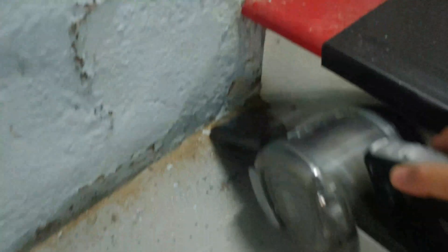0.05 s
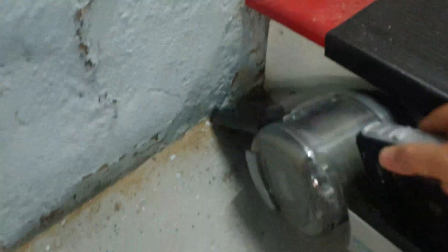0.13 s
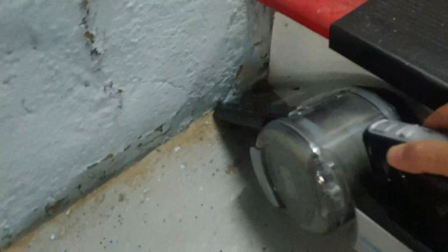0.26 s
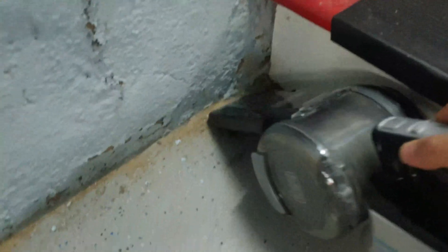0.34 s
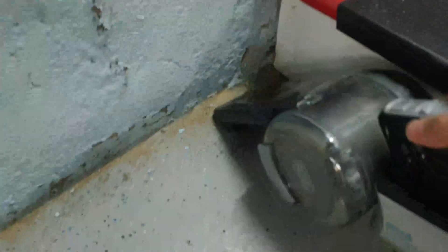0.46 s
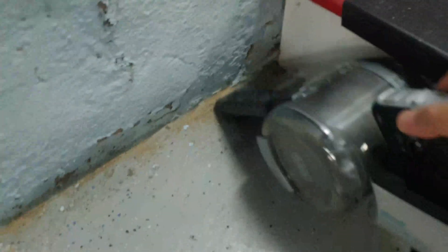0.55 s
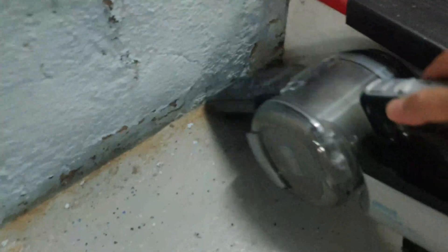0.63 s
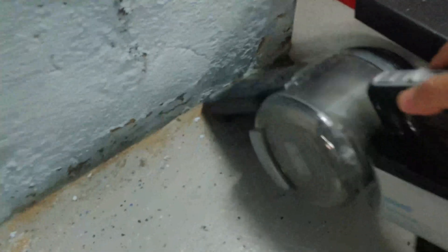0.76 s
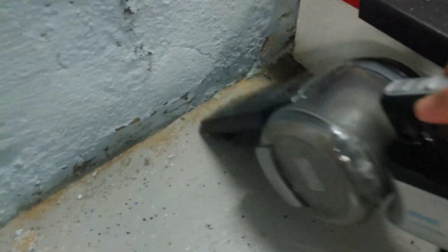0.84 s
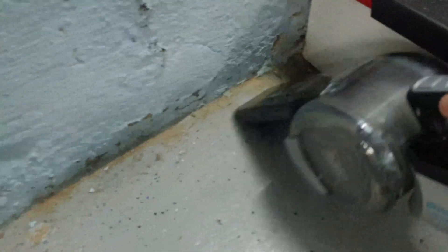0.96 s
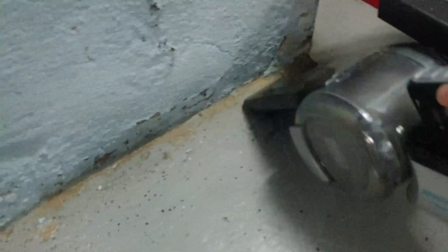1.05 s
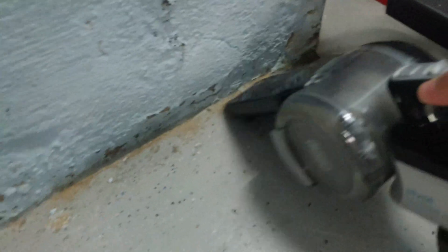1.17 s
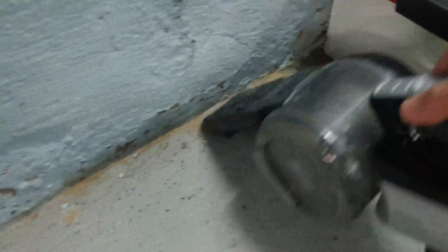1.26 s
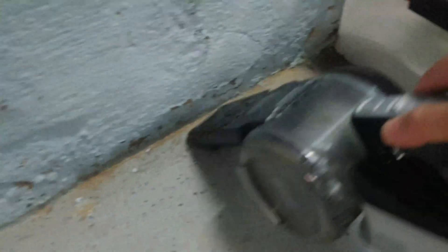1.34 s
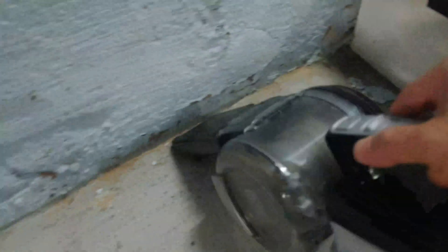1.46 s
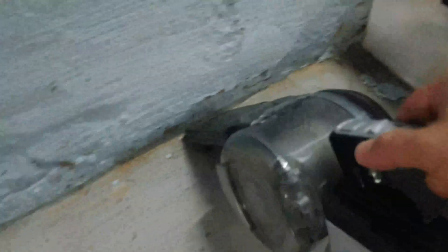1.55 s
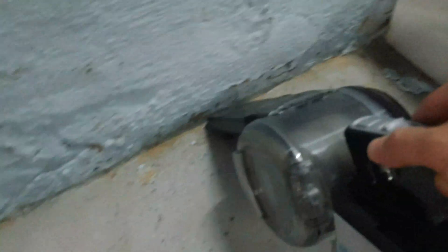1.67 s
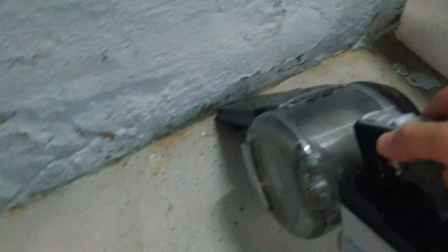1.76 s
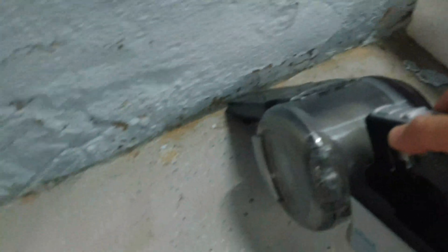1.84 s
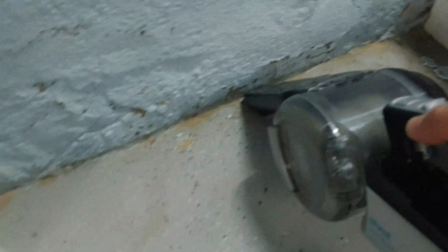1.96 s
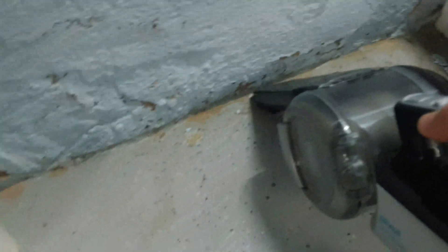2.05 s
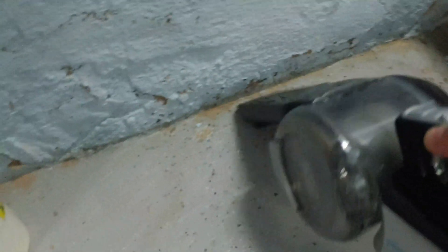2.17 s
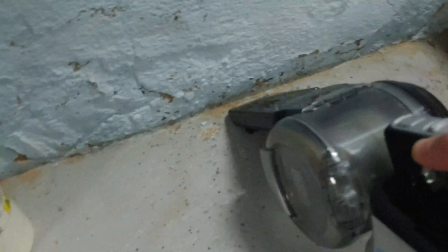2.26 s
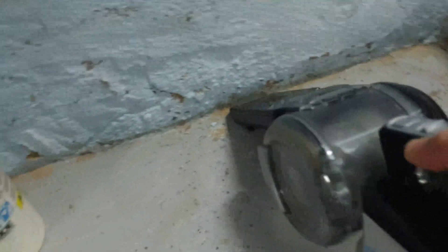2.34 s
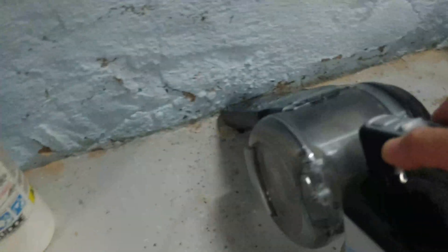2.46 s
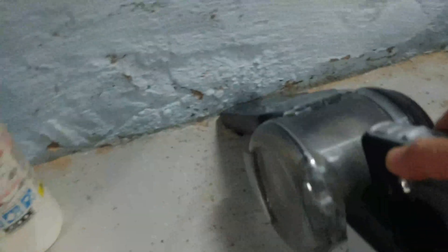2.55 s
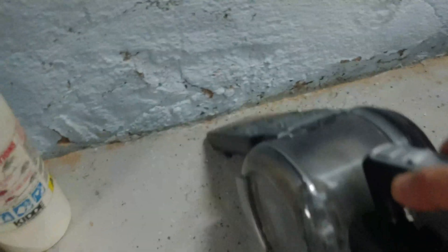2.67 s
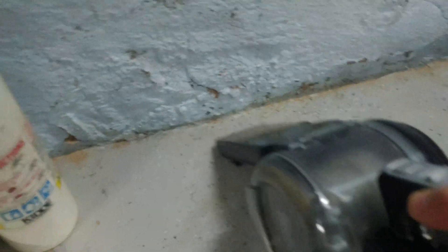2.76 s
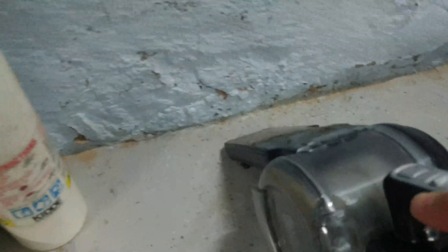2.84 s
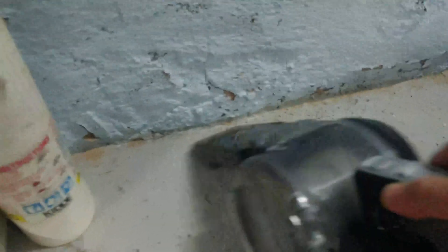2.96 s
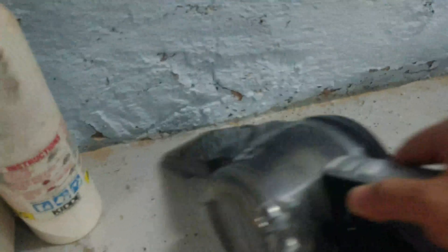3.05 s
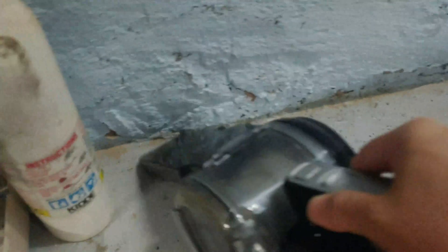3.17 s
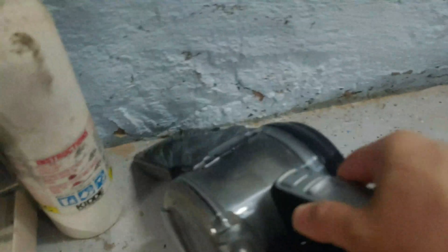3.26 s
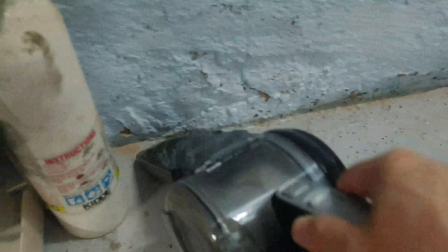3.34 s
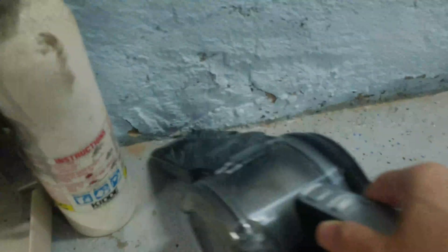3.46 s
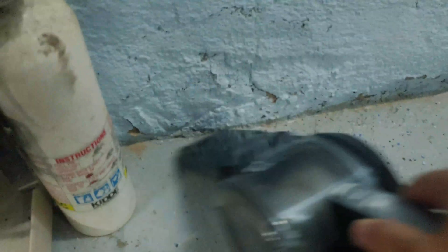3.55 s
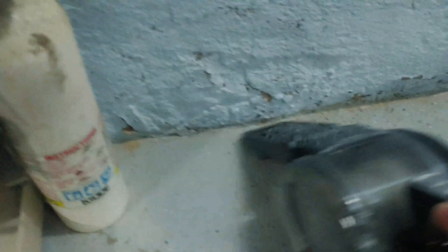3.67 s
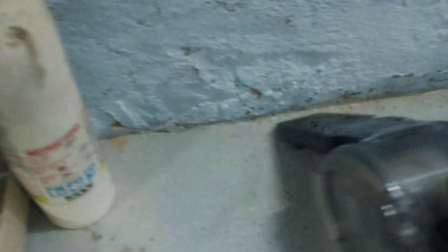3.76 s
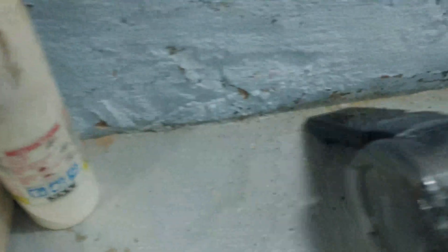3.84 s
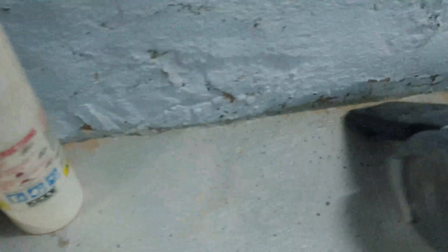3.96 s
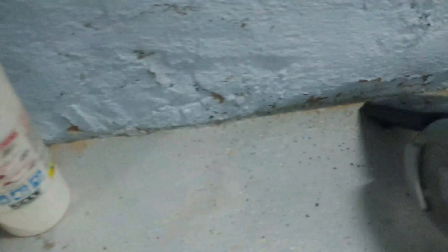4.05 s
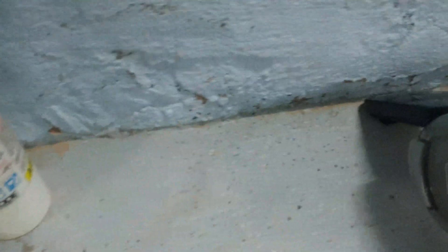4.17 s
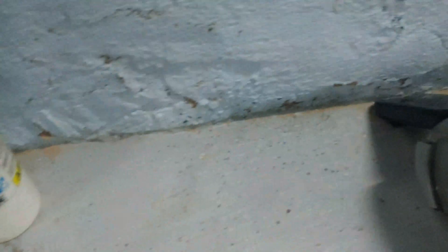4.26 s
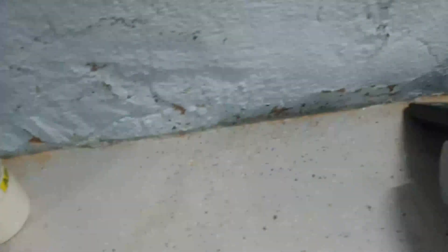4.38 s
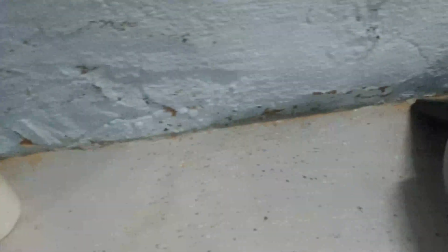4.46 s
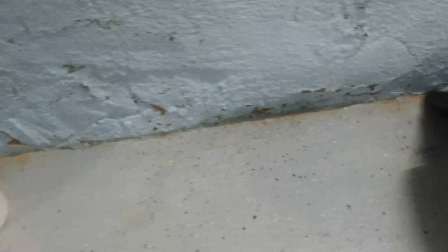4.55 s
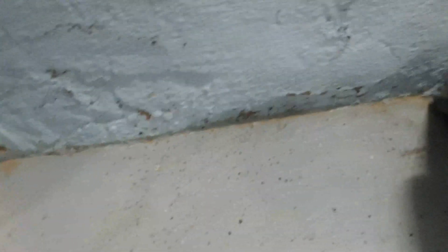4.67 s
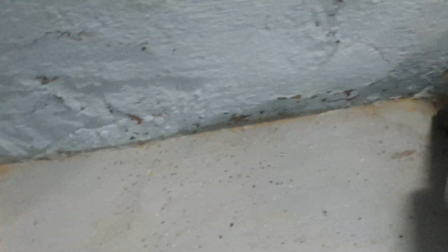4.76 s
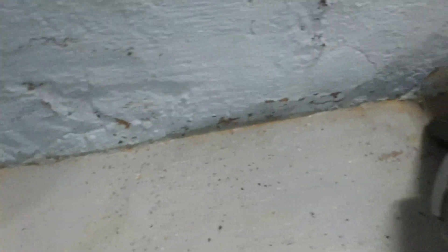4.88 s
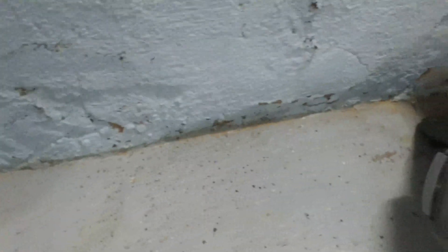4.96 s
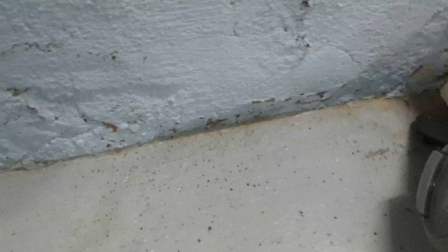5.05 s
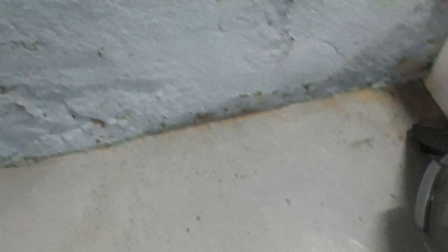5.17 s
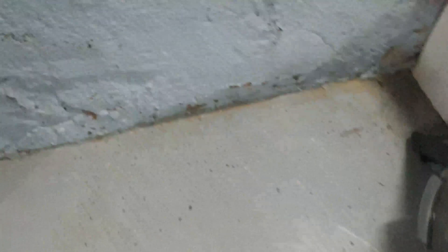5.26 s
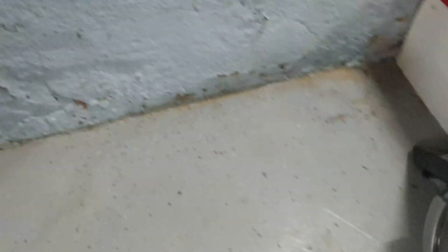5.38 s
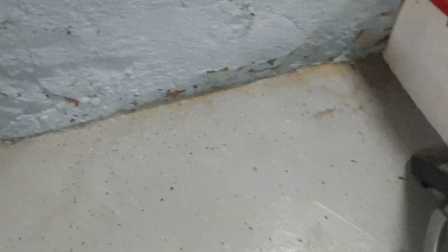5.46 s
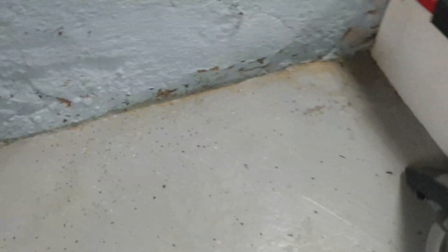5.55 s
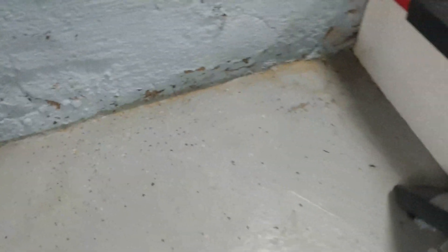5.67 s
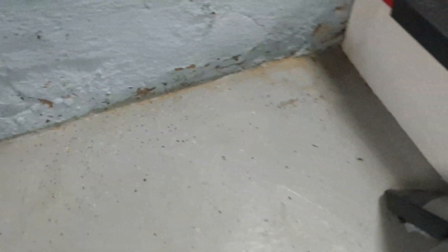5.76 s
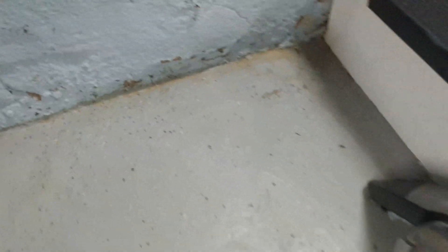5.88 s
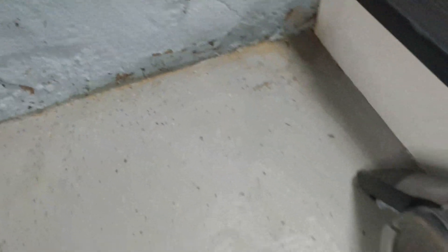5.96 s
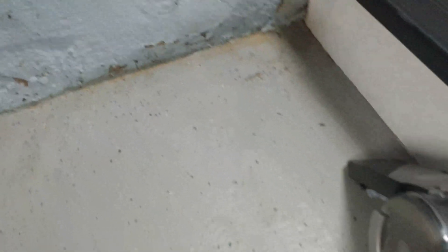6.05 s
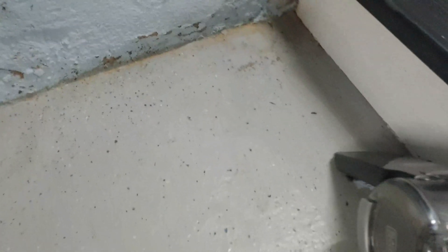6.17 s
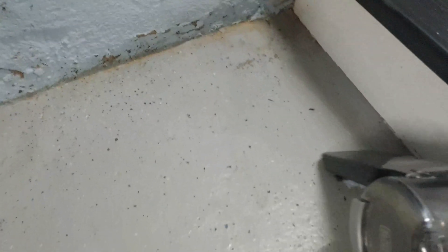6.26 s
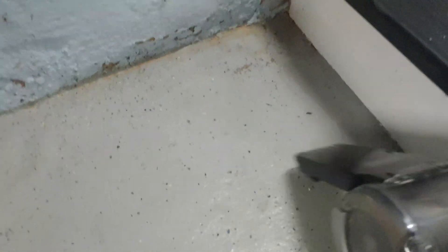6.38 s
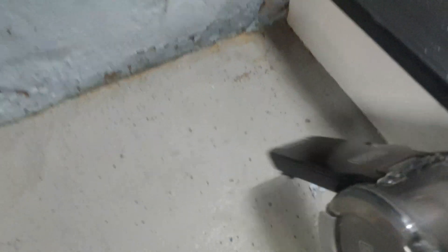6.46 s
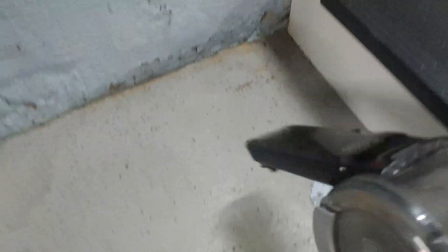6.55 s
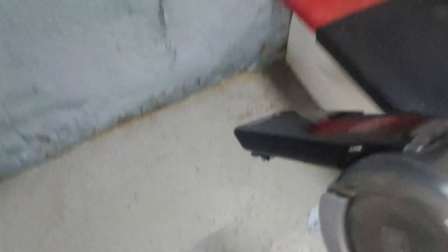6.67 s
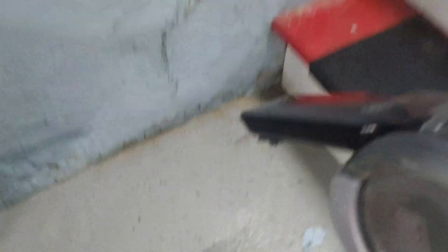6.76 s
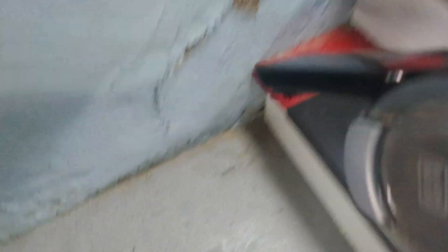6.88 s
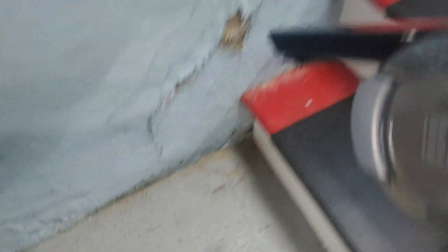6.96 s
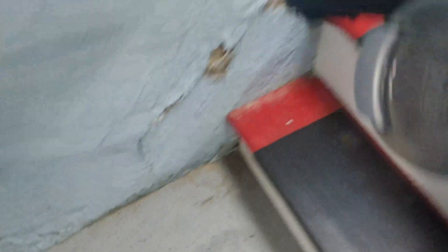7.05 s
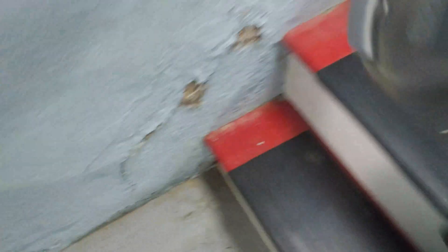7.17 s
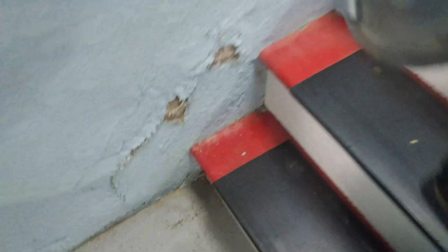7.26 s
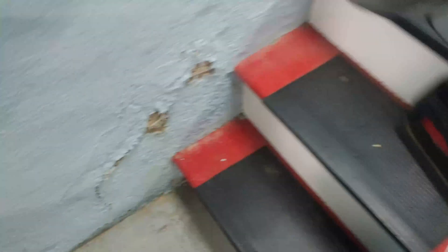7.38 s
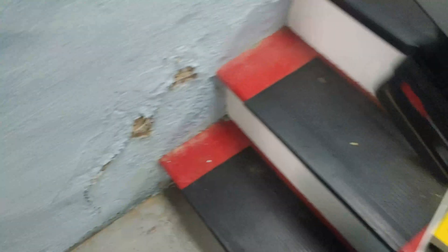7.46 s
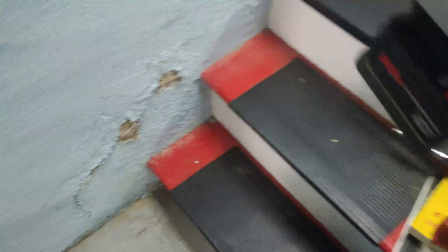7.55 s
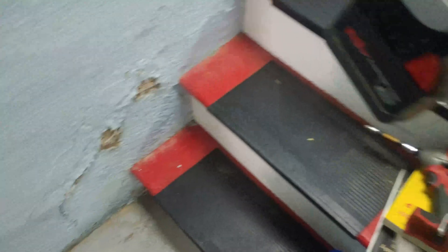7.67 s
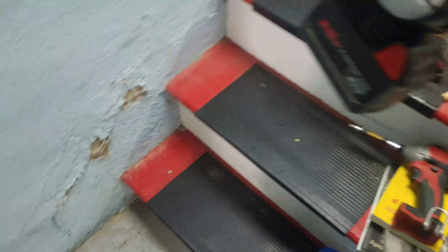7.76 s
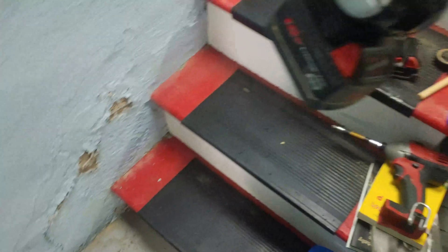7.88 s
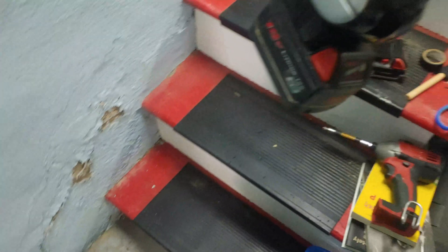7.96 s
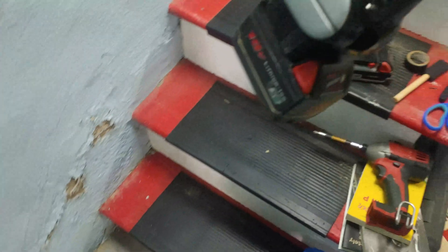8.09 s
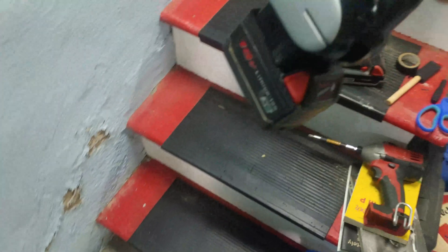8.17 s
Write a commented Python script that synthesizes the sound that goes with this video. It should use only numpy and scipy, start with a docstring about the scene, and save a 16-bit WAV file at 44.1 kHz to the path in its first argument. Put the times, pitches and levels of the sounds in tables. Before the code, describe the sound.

Indoors in a small plastered stairwell, a handheld vacuum cleaner drones close by. Air rushes in at the nozzle and hisses from the vents over a hum and wavering whine, with brief dips and dull knocks. Then the power goes off and the motor slides lower, the airflow weakening, with low handling rumble and a short chatter of plastic before near quiet.

```python
"""On a stair landing, a cordless handheld vacuum is drawn along the foot of a wall, close to the listener.
Its motor sounds as sinusoids locked to the shaft angle: a hum, a blade whine and faint overtones.
Its air is filtered noise, rushing in at the nozzle, through the duct and hissing out of the vents.
It is switched off and coasts down, so that all tones glide lower and the air fades.
Noise bursts rumble and bump; a plastic part, a set of decaying modes, clacks as it is lifted away."""
import sys
import numpy as np
from scipy import signal
from scipy.fft import rfft, irfft, next_fast_len
from scipy.io import wavfile
from scipy.ndimage import uniform_filter1d, map_coordinates

SR = 44100
rng = np.random.default_rng(int(sys.argv[2]) if len(sys.argv) > 2 else 0)


def wav_record(signal):
    """Record a signal, one row per channel, as 16-bit PCM in the file named by sys.argv[1]."""
    frames = np.transpose(np.atleast_2d(signal))
    bounded = np.clip(frames, -1, 1)
    # unit amplitude maps onto the largest positive 16-bit level
    quanta = np.round(bounded * 32767).astype(np.int16)
    wavfile.write(sys.argv[1], SR, quanta)


N = 362487
TIME = np.arange(N) / SR  # s


def undb(db):
    """Level law: decibels to an amplitude ratio."""
    return 10 ** (np.asarray(db) / 20)


def unit(x):
    """Normalisation to a root-mean-square value of 1."""
    return x / np.sqrt(np.mean(x ** 2))


def curves(rows):
    """Linear interpolation: each column of a table is joined by straight lines in time."""
    s, *columns = np.transpose(rows)
    return [np.interp(TIME, s, column) for column in columns]


def colour(x, spectrum):
    """Linear filtering: the spectrum is weighted by levels interpolated over log frequency."""
    hz, db = np.transpose(spectrum)
    size = next_fast_len(len(x))
    bins_hz = np.maximum(np.arange(size // 2 + 1) * SR / size, 1)
    gain = undb(np.interp(np.log(bins_hz), np.log(hz), db))
    return irfft(rfft(x, size) * gain, size)[:len(x)]


def noise(spectrum):
    """Random noise: white noise coloured by a spectrum and brought to unit strength."""
    return unit(colour(rng.standard_normal(N), spectrum))


def walk(rate):
    """Random modulation: smooth chance with a spread of 1, changing about rate times a second."""
    knots = rng.standard_normal(8192)
    path = np.interp(TIME * rate, np.arange(len(knots)), knots)
    return unit(uniform_filter1d(path, max(int(SR / rate / 2), 1)))


def bursts(rows, rise_s, t60):
    """Exponential decay: blows given as (s, dB) swell quickly and lose 60 dB in t60 seconds."""
    envelope = np.zeros(N)
    for s, db in rows:
        age = TIME[TIME > s] - s
        decay = undb(db - 60 * np.minimum(age / t60, 10))
        envelope[N - len(age):] += decay * (1 - np.exp(-age / rise_s))
    return envelope


def resonance(tone_hz, hz, width):
    """Resonance curve: 1 when the tone sits on the resonance, one half at half the width away."""
    return 1 / (1 + (2 * (tone_hz - hz) / width) ** 2)


# Spectrum of the quiet room. Each row: frequency in Hz, relative level in dB per Hz.
ROOM_SPECTRUM = [(20, 1), (50, 13), (150, -20), (400, 6), (900, -37), (2000, -61), (16000, -74)]


def room_tone():
    """Stationary background noise: a faint coloured noise of constant level."""
    return undb(-52) * noise(ROOM_SPECTRUM)


def stairwell(x, t60, wet_db):
    """Diffuse reverberation: plastered walls return a short, exponentially decaying noise tail."""
    age = TIME[:SR // 2]
    tail = rng.standard_normal(len(age)) * undb(-60 * age / t60) * (age > .006)
    return x + undb(wet_db) * signal.fftconvolve(x, tail / np.linalg.norm(tail))[:N]


# Low rumbles as the hand swings. Each row: start in seconds, relative level in dB.
RUMBLE_TIMES = [(2.62, -26), (3.1, -32), (6.82, -27), (7.55, -38.5), (8.05, -79)]
# Spectrum of the rumble. Each row: frequency in Hz, relative level in dB per Hz.
RUMBLE_SPECTRUM = [(15, -12), (40, 0), (80, 1), (130, -23), (300, -59)]


def rumbles():
    """Low-frequency noise bursts: each swing of the hand rumbles and dies away."""
    return noise(RUMBLE_SPECTRUM) * bursts(RUMBLE_TIMES, rise_s=0.047, t60=1.0)


# Soft bumps of the body. Each row: start in seconds, relative level in dB.
BUMP_TIMES = [(0.722, -20), (1.317, -25), (1.506, -21), (2.701, -43), (4.067, -13), (4.619, -5.5),
              (4.778, -19), (5.417, -24)]
# Spectrum of a bump. Each row: frequency in Hz, relative level in dB per Hz.
BUMP_SPECTRUM = [(30, -22), (90, -9), (150, -19.5), (290, -5), (430, -19.5), (700, -14), (2000, -66)]
BUMP_DB = -6.5  # gain of all bumps


def bumps():
    """Damped impact: each dull bump is a short burst of low noise."""
    return undb(BUMP_DB) * noise(BUMP_SPECTRUM) * bursts(BUMP_TIMES, rise_s=0.0044, t60=0.13)


# A plastic part chatters and seats. Each row: start in seconds, relative level in dB.
CONTACTS = [(7.8204, -10.5), (7.822, -15), (7.8265, -9.5), (7.8306, -16.5), (7.831, -14), (7.8340, -5.5),
            (7.836, -12), (8.056, -33)]
# Modes of the plastic. Each row: frequency in Hz, relative level in dB, 60 dB decay time in seconds.
PLASTIC_MODES = [(1050, -29, .012), (3160, -33, 0.028), (5170, -18, 0.013), (5490, -14, 0.017),
                 (7000, -9.5, 0.013), (7530, 1.5, 0.0063), (8050, -2, 0.0074), (8550, -8, 0.011),
                 (10330, -12, 0.01), (12000, -14, 0.0074), (14700, -11, .004)]


def clacks():
    """Modal excitation: each contact rings the plastic, and a short rustle of ringing follows."""
    age = TIME[:SR // 10]
    ring = sum(undb(db - 60 * age / t60) * np.sin(2 * np.pi * hz * age)
               for hz, db, t60 in PLASTIC_MODES)
    ring = ring * (1 - np.exp(-age / 0.00018))
    blows = np.zeros(N)
    for s, db in CONTACTS:
        blows[int(s * SR)] += undb(db)
    rustle = undb(-36) * rng.standard_normal(N) * bursts(CONTACTS, rise_s=0.0016, t60=0.067)
    return undb(5.0) * signal.fftconvolve(blows + rustle, ring)[:N]


def handling():
    """Superposition: rumble of swinging, dull bumps of the body and sharp chatter of plastic."""
    return rumbles() + bumps() + clacks()


# Motor speed under power, following the load and the draining battery.
# Each row: time in seconds, shaft frequency in Hz.
RUNNING_SPEED = [(0.0, 554.3), (1.35, 555.6), (1.8, 553.7), (3.0, 553.8), (3.5, 552.4), (4.3, 553.2),
                 (5.0, 551.4), (6.19, 549.1)]
SHAFT_HZ = 554  # nominal full speed
OFF_S = 6.186  # time of switching off
FRICTION_S, DRAG_PER_S = 1.783, 0.5  # friction time constant in s, fan drag at full speed in 1/s


def shaft_speed():
    """Rotational damping: a share of full speed, nearly steady, then braked by friction and fan drag."""
    decay = np.exp(-np.maximum(TIME - OFF_S, 0) / FRICTION_S)
    drag = 1 + DRAG_PER_S * FRICTION_S * (1 - decay)
    return curves(RUNNING_SPEED)[0] / SHAFT_HZ * decay / drag


def patchy(x, width_hz, rate, patchy_db):
    """Interference of many nearby reflections: narrow bands swell and fade independently."""
    hz, s, frames = signal.stft(x, SR, nperseg=2048)
    field = rng.standard_normal((1024, 256))
    place = np.meshgrid(hz / width_hz, s * rate, indexing="ij")
    db = patchy_db * map_coordinates(field, place, order=1, mode="mirror")
    return unit(signal.istft(frames * undb(db), SR)[1][:N])


# The rush dips briefly. Each row: centre in seconds, relative depth in dB.
RUSH_DIPS = [(.35, 5), (.39, 7), (.52, 4), (.65, 7), (.70, 13), (.82, 4), (1.30, 13), (1.35, 4), (1.72, 4),
             (1.93, 5), (2.035, 5), (2.25, 6), (3.42, 4), (4.02, 5), (4.25, 5), (4.72, 7), (5.77, 4),
             (6.02, 5), (6.19, 5), (7.52, 4)]


def dips(length_s):
    """Amplitude modulation: smooth brief drops in level, in dB."""
    return -sum(db * np.exp(-((TIME - s) / length_s) ** 2) for s, db in RUSH_DIPS)


def falling(speed, law):
    """Power law of flow noise: its gain falls with speed, with one swell as the cleaner is lifted."""
    power, s, length_s, db = law
    return speed ** power * undb(db * np.exp(-((TIME - s) / length_s) ** 2))


# Air at the nozzle, louder as it closes on the floor.
# Each row: time in seconds, relative buffeting level in dB, relative rush level in dB.
INTAKE_LEVELS = [(0.0, -30.5, -25), (0.36, -41, -26), (1.22, -34, -26), (1.94, -45.5, -30),
                 (2.6, -37.5, -30), (2.68, -36, -28.5), (2.9, -41, -27), (3.26, -28, -23), (3.42, -49, -29),
                 (3.8, -30, -22), (4.0, -44, -31.5), (4.1, -28.5, -24), (4.26, -37, -29.0),
                 (4.62, -33, -28.5), (5.02, -48, -34), (5.7, -40.5, -27.5), (5.76, -47.0, -33),
                 (6.18, -48.5, -28)]
# Spectrum of the buffeting. Each row: frequency in Hz, relative level in dB per Hz.
BUFFET_SPECTRUM = [(15, -32), (40, -6.5), (105, 4), (200, -1), (300, -3), (450, -36), (900, -20.5)]
# Spectrum of the nozzle rush. Each row: frequency in Hz, relative level in dB per Hz.
NOZZLE_SPECTRUM = [(220, -26), (350, -10), (460, 0.5), (700, 1), (950, 0.5), (1300, -3.5), (1700, -6.5),
                   (2600, -24)]
# Air through the body. Each row: time in seconds, relative duct level in dB, relative vent level in dB.
EXHAUST_LEVELS = [(0.0, -35, -17), (0.64, -30, -15), (1.16, -27.5, -15.5), (2.24, -34, -16),
                  (2.32, -29, -13), (2.68, -30.5, -16.5), (2.86, -27.5, -15.5), (4.06, -31.5, -16),
                  (4.32, -29, -15), (5.08, -35, -17.5), (5.94, -33, -19), (6.18, -34.5, -21)]
# Spectrum of the duct rush. Each row: frequency in Hz, relative level in dB per Hz.
DUCT_SPECTRUM = [(900, -27), (1700, 1), (2200, 9.5), (2900, 6.5), (3600, 7.5), (4700, 7), (6000, 3.5),
                 (9000, -43)]
# Spectrum of the vent hiss. Each row: frequency in Hz, relative level in dB per Hz.
VENT_SPECTRUM = [(2500, -64), (4500, -20), (5500, -8), (6500, -13.5), (7200, 1), (7900, 4.5), (8600, 1.5),
                 (9500, -4), (11000, -9), (13000, -11), (16000, -14.5)]
# Spectrum of the vent howl. Each row: frequency in Hz, relative level in dB per Hz.
HOWL_SPECTRUM = [(4500, -15.5), (5300, -1), (6150, 14.5), (6700, 12.5), (7400, 11.5), (8500, -59)]
# Fall of each air noise while coasting, with one swell as the cleaner is lifted and turned.
# Each holds: power of speed, time of the swell in seconds, its length in seconds, its height in dB.
BUFFET_LAW = (1, 6.9, 0.7, 6.3)
NOZZLE_LAW = (1.9, 7.23, 0.7, 8)
DUCT_LAW = (1.37, 6.6, 0.29, 10.1)
VENT_LAW = (1.95, 6.84, 0.98, 8.1)
# The intake flow stalls in the last slow turns. It holds: share of full speed, power of the fall below it.
STALL_LAW = (0.28, 2.8)
GUST_DB = .7  # spread of the fast surges
NOZZLE_DIP, DUCT_DIP, CORE_DIP = .8, 1.7, .2  # how deeply each noise follows the dips, times the depth


def intake_air(speed, surge_db, dip_db):
    """Turbulence noise: buffeting, nozzle rush and duct rush weaken with speed until the flow stalls."""
    buffet_db, nozzle_db = curves(INTAKE_LEVELS)
    duct_db = curves(EXHAUST_LEVELS)[0]
    buffet = noise(BUFFET_SPECTRUM) * undb(buffet_db + 0.1 + 2.4 * walk(16) + 0.89 * dip_db)
    nozzle = patchy(noise(NOZZLE_SPECTRUM), width_hz=84.64, rate=11, patchy_db=6.5)
    nozzle = nozzle * undb(nozzle_db - 0.32 + 0.98 * walk(9) + surge_db + NOZZLE_DIP * dip_db)
    duct = patchy(noise(DUCT_SPECTRUM), width_hz=70, rate=9, patchy_db=7.5)
    duct = duct * undb(duct_db + 2.14 + 2.0 * walk(9) + surge_db + DUCT_DIP * dip_db)
    drawn = buffet * falling(speed, BUFFET_LAW)
    drawn = drawn + nozzle * falling(speed, NOZZLE_LAW) + duct * falling(speed, DUCT_LAW)
    stall_share, steepness = STALL_LAW
    return drawn * np.minimum(speed / stall_share, 1) ** steepness


def vent_air(speed, surge_db, dip_db):
    """Jet noise with resonance: the vents hiss, and their howl weakens faster as the flow slows."""
    vent_db = curves(EXHAUST_LEVELS)[1]
    howl = patchy(noise(HOWL_SPECTRUM), width_hz=110, rate=7, patchy_db=6.5)
    howl = undb(-5) * speed ** 1.5 * howl
    hiss = patchy(noise(VENT_SPECTRUM), width_hz=110, rate=8, patchy_db=3.5)
    # the vents' main resonance carries on through the dips
    band = signal.butter(2, [5800, 9500], "bandpass", fs=SR, output="sos")
    core = signal.sosfiltfilt(band, hiss)
    vent = (core + howl) * undb(CORE_DIP * dip_db) + (hiss - core) * undb(dip_db)
    return vent * undb(vent_db - 0.73 + surge_db) * falling(speed, VENT_LAW)


def air(speed):
    """Flow noise: intake and vents share the same dips, and all but the buffeting share the surges."""
    surge_db = GUST_DB * walk(35) + 0.29 * walk(7)
    dip_db = dips(length_s=0.016)
    return intake_air(speed, surge_db, dip_db) + vent_air(speed, surge_db, dip_db)


def tone(angle, db, scatter_db, rate):
    """Interference: a direct tone plus shifting reflections, steady when strong, fading when weak."""
    scatter = walk(rate) * np.sin(angle) + walk(rate) * np.cos(angle)
    return undb(db) * np.sin(angle) + undb(scatter_db) * scatter


# Levels of the tones under power, the strongest of which change as the cleaner is turned.
# Each row: time in seconds, relative level in dB.
# Shaft orders 1 to 4:
HUM_LEVEL = [(0.0, -30.5), (0.6, -18.5), (0.72, -24.5), (1.32, -18.5), (2.1, -25.5), (2.46, -19),
             (2.58, -34), (2.8, -17), (3.06, -22.5), (3.16, -33), (3.64, -34), (3.72, -22.5), (4.92, -21.5),
             (5.0, -36.5), (5.16, -22.5), (5.32, -28.5), (5.5, -17.5), (6.18, -14.0)]
OCTAVE_LEVEL = [(0.0, -27.5), (0.88, -36.5), (1.8, -29.5), (1.86, -49), (2.36, -41), (4.42, -42.5),
                (4.7, -28), (5.38, -40.5), (5.58, -21), (5.64, -39.0), (6.0, -48), (6.18, -34)]
TWELFTH_LEVEL = [(0.0, -53), (0.28, -41.5), (1.32, -47), (1.46, -29.5), (1.66, -49.5), (3.08, -29.5),
                 (3.14, -39), (3.72, -48), (3.78, -24.5), (4.02, -37.5), (4.12, -28), (4.36, -30),
                 (4.54, -38), (5.5, -57), (5.58, -31.5), (6.18, -35)]
FOURTH_LEVEL = [(0.0, -31.5), (1.3, -40.5), (2.2, -42), (3.1, -50), (4.25, -40), (4.7, -54), (5.5, -66),
                (5.7, -43), (6.18, -45)]
# Once, twice and three times the passing rate of the seven blades:
BLADE_LEVEL = [(0.0, -26), (0.1, -45), (0.3, -35), (1.15, -40), (1.32, -21.5), (1.62, -41), (1.78, -29.5),
               (2.08, -35), (2.25, -61), (2.85, -52), (3.25, -31), (3.45, -46), (3.78, -30), (4.25, -30),
               (4.4, -47), (4.55, -25), (4.9, -36), (6.18, -40)]
WHINE_LEVEL = [(0.0, -22), (0.48, -19.5), (0.54, -28.5), (0.66, -10), (0.78, -26), (0.94, -13), (1.62, -24),
               (1.66, -14.5), (1.78, -27), (1.94, -15), (2.98, -25.5), (3.08, -12.5), (3.14, -38),
               (3.48, -11.5), (3.62, -29), (4.54, -15.5), (4.64, -29.5), (4.72, -9.5), (4.8, -14),
               (5.22, -12.5), (5.66, -19.5), (5.72, -10.5), (5.88, -27.5), (6.18, -16.5)]
TOP_WHINE_LEVEL = [(0.0, -44), (2.2, -54), (2.35, -33), (3.05, -28), (3.3, -49), (3.8, -34), (4.3, -43),
                   (4.6, -45), (5.75, -31), (6.18, -44)]


def running_tones(angle):
    """Unbalance and blade passing: low shaft orders hum and the seven blades whine."""
    hum = tone(angle, curves(HUM_LEVEL)[0] - .7 + 1.46 * walk(16), scatter_db=-41, rate=14)
    for order, rows in enumerate([OCTAVE_LEVEL, TWELFTH_LEVEL, FOURTH_LEVEL], 2):
        level_db = curves(rows)[0] - 1.3 + 4.3 * walk(16)
        hum = hum + tone(order * angle, level_db, scatter_db=-49.5, rate=18)
    blade_angle = 7 * angle
    # eddies at the blade tips shake the whine in level and phase
    first, second, third = [k * blade_angle + 0.074 * walk(110) for k in range(1, 4)]
    blade_db = curves(BLADE_LEVEL)[0] - 1.5 + 3 * walk(14)
    whine_db = curves(WHINE_LEVEL)[0] - .8 + 1.44 * walk(28)
    top_db = curves(TOP_WHINE_LEVEL)[0] + 4 * walk(9)
    return (hum + tone(first, blade_db, scatter_db=-45.5, rate=13)
            + tone(second, whine_db, scatter_db=-27.5, rate=20)
            + tone(third, top_db, scatter_db=-47.5, rate=11))


# Tones while coasting.
# Each row: shaft order, relative level in dB at full speed, power of speed that the tone falls with.
COASTING_ORDERS = [(1, -22.5, 1.67), (2, -38.5, 1.73), (3, -36.5, 1.96), (4, -41, 1.7), (7, -39, 1.62)]
# Peaks and notches of the body that a falling tone passes through.
# Each row: shaft order, frequency in Hz, width in Hz, lift in dB.
BODY_SWELLS = [(1, 500, 50, 1), (1, 475, 45, -5.5), (1, 380, 128, 17), (1, 307, 17, -16), (1, 186, 19, -17),
               (1, 167, 10, 8), (2, 1020, 120, -25), (2, 764, 190, 26.5), (2, 647, 74, 20),
               (2, 605, 40, -23), (2, 504, 120, 30), (2, 448, 13, -12), (2, 322, 18, 13),
               (3, 1380, 59, 6.5), (3, 860, 580, 14.5), (4, 1200, 340, 15), (4, 930, 170, 4),
               (7, 2900, 1350, 12), (7, 1350, 210, 12)]
BASS_LIMIT_HZ = 178  # lowest tone that the body radiates well
PHASE_JITTER = .06  # spread in radians per shaft order


def coasting_tones(angle, speed):
    """Swept resonance: falling tones swell on the body, which is too small to radiate much bass."""
    out = 0
    for order, db, law in COASTING_ORDERS:
        tone_hz = order * SHAFT_HZ * speed
        lift_db = sum(lift * resonance(tone_hz, hz, width)
                      for swell_order, hz, width, lift in BODY_SWELLS if swell_order == order)
        waver_db = 1.85 * np.sqrt(order) * walk(24)
        radiated = np.minimum(tone_hz / BASS_LIMIT_HZ, 1) ** 9
        strength = undb(db + lift_db + waver_db) * speed ** law * radiated
        out = out + strength * np.sin(order * angle + PHASE_JITTER * order * walk(90))
    return out


# Faint overtones of the rotor.
# Each row: shaft order, relative level in dB under power, relative level in dB coasting.
ROTOR_OVERTONES = [(5, -48, -40), (6, -43, -45), (8, -46, -51), (9, -48, -57), (10, -43, -47),
                   (11, -36, -48), (12, -38, -52)]
# Resonances that the overtones sweep through. Each row: frequency in Hz, width in Hz, lift in dB.
CASING_RESONANCES = [(893, 66, 25), (1220, 110, 11), (1760, 83, 11.5)]
FADING_DB, FLICKER_DB = 4.5, 3.6  # spread of the slow and the fast changes of level


def rotor_overtones(angle, speed, power):
    """Source and filter: faint shaft harmonics are lifted where they meet casing resonances."""
    overtones = 0
    for order, powered_db, coasting_db in ROTOR_OVERTONES:
        lift_db = sum(db * resonance(order * SHAFT_HZ * speed, hz, width)
                      for hz, width, db in CASING_RESONANCES)
        strength = power * undb(powered_db) + (1 - power) * undb(coasting_db) * speed ** 1.25
        gain = undb(lift_db + FADING_DB * walk(8) + FLICKER_DB * walk(30) - 5.0)
        overtones = overtones + strength * gain * np.sin(order * angle + 0.58 * walk(40))
    # the last slow turns no longer shake the casing
    return overtones * np.clip(speed / 0.27, 0, 1) ** 3.8


def motor(speed):
    """Harmonic synthesis: every tone is a multiple of one slightly unsteady shaft angle."""
    # 1 up to OFF_S, then a straight fall to 0 at OFF_S + 0.067 s, as the coasting tones fade in
    power = np.clip((OFF_S - TIME) / 0.067 + 1, 0, 1)
    unsteady = 1 + 0.00022 * walk(45) + 0.000515 * walk(3)
    angle = 2 * np.pi * np.cumsum(SHAFT_HZ * speed * unsteady) / SR
    tones = power * running_tones(angle) + (1 - power) * coasting_tones(angle, speed)
    return np.sqrt(2) * (tones + rotor_overtones(angle, speed, power))


def scene():
    """Direct and reverberant sound: the cleaner is close and dry, its knocks ring in the stairwell."""
    speed = shaft_speed()
    knocks = stairwell(handling(), t60=0.097, wet_db=-13.0)
    sound = room_tone() + knocks + air(speed) + motor(speed)
    return np.array([sound, sound])


TOP_HZ = 15850  # edge of the low-pass filter


def record(dry):
    """Band limitation: both equal channels are clipped at 0.9 and the top is cut steeply."""
    low_pass = signal.ellip(12, .1, 80, TOP_HZ, fs=SR, output="sos")
    return signal.sosfilt(low_pass, np.clip(dry, -.9, .9))


dry = scene()
out = record(dry)
wav_record(out)
```